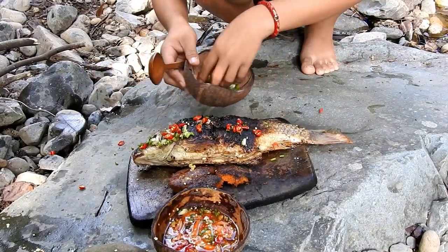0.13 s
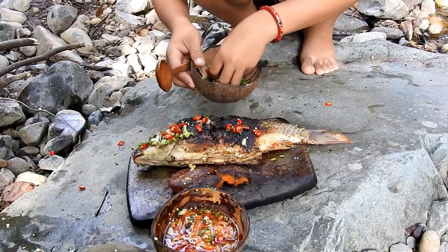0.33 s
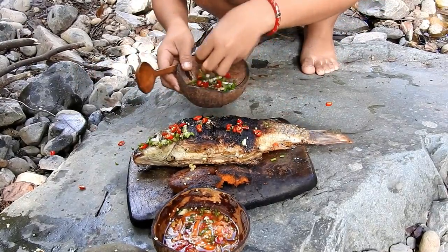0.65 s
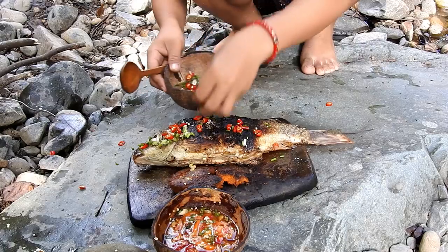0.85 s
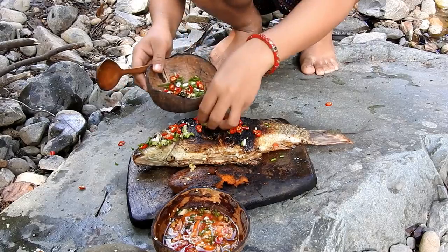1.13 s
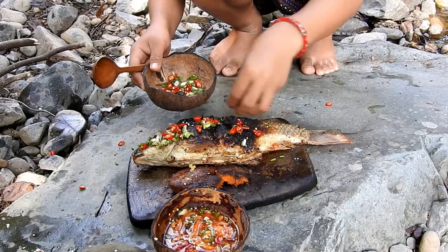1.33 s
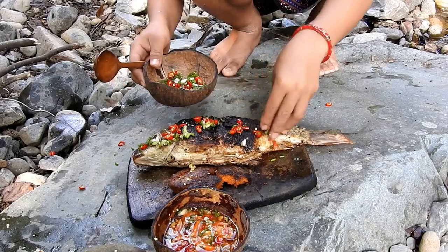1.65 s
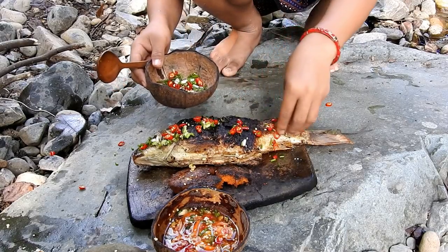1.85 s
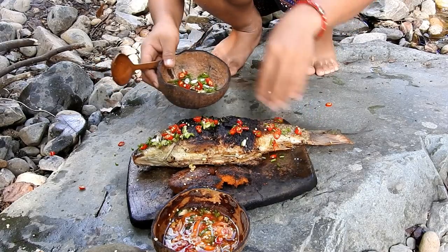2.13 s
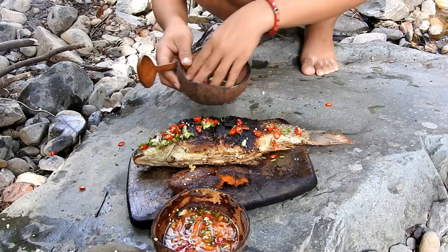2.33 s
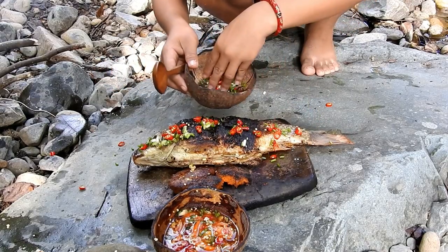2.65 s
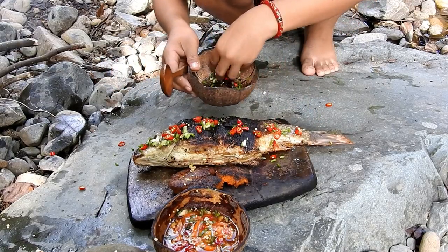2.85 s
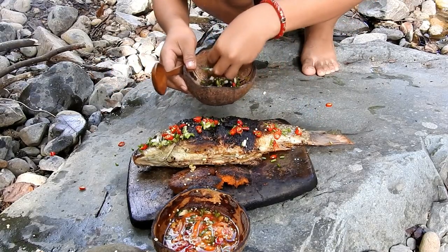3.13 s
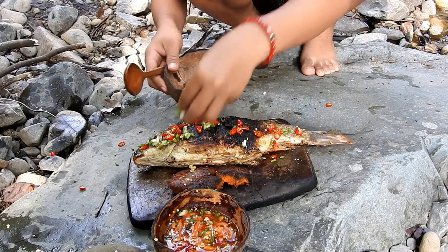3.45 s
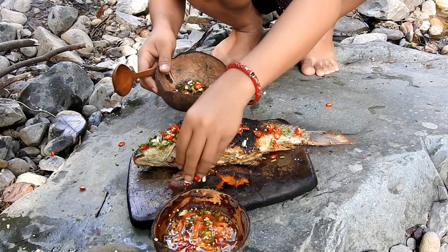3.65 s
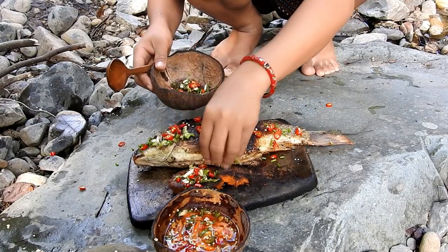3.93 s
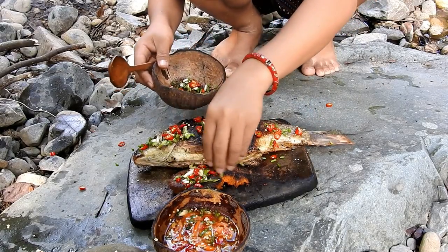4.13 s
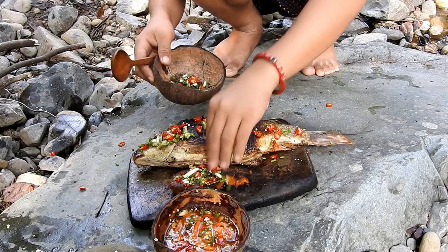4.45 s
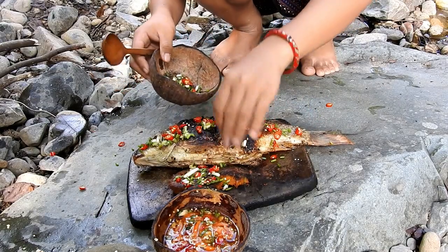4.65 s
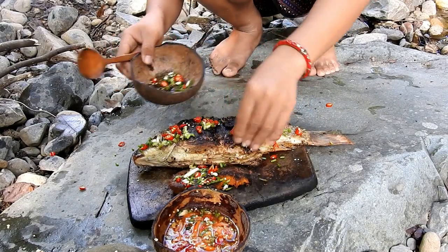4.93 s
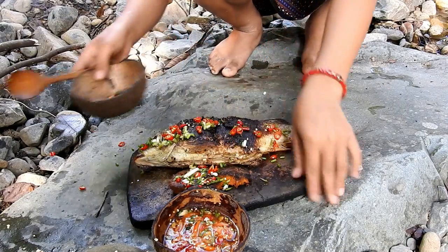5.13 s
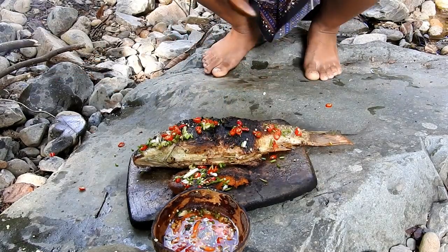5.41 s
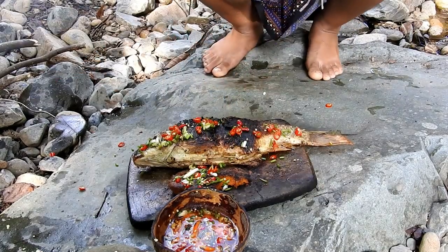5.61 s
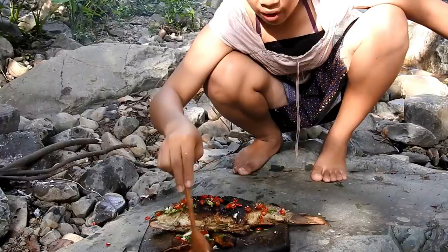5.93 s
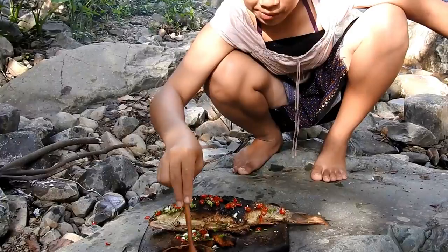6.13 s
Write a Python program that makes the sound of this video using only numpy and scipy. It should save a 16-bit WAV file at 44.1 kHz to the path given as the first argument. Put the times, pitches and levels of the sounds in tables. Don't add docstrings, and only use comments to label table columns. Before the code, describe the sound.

A shallow stream flows over stones throughout, a steady wide wash with low gurgle, mid-range bubbling and fine fizz, captured by a small stereo microphone pair with little extreme treble. Around 0.3 s a short, high raspy insect chirp sounds, with a fainter lower one together with it. Fingers tick on a wooden bowl, dry and bright, at 0.6 s and more strongly at 0.85 s. Larger bubbles plop irregularly, with a prominent cluster near 1.8 s. A softer tick comes at 2.1 s, a firm one at 3.5 s. Another thin chirp follows at 3.8 s, then a quick double tick at 4.4 s, its second touch stronger. More plops bunch around 4.95 s. Near 5.3 s there is a faint crackly tick and a last chirp. From about 5.4 to 5.9 s everything is silent; then the stream returns abruptly and continues to the end.

```python
import sys
import numpy as np
from scipy import signal
from scipy.fft import rfft, irfft
from scipy.io import wavfile
from scipy.ndimage import uniform_filter1d

SR = 44100
rng = np.random.default_rng(int(sys.argv[2]) if len(sys.argv) > 2 else 0)


def master_out(mix):
    frames = np.transpose(np.atleast_2d(mix))
    ceiling = np.clip(frames, -1, 1)
    pcm = np.round(ceiling * 32767).astype(np.int16)
    wavfile.write(sys.argv[1], SR, pcm)


def decibels_to_gain(level_db):
    exponent = np.asarray(level_db, float) / 20
    return 10 ** exponent


N = 276948


def evened(x):
    return x / np.sqrt(np.mean(x ** 2) + 1e-20)


def read(points, hz, axis=1):
    table = np.transpose(points)
    return np.interp(np.log(hz + 1), np.log(table[0] + 1), table[axis])


def add(mix, start_s, sound):
    part = mix[round(start_s * SR):][:len(sound)]
    part += sound[:len(part)]


def ports(near, other):
    # pitch_hz, likeness (0-1), left_lag_rad, left_minus_right_db
    left_right = [(40, 0.96, -.3, 0), (150, 1, 0, -3), (550, 0.98, 0.16, -3), (1207, 0.93, 0.53, -8.5),
                  (2820, .85, 0.65, -5.5), (4200, 0.8, 0.84, -2.5), (6260, 0.6, 1.74, -2),
                  (7930, 0.3, 2.5, -2.5), (9800, .62, 3.5, -1), (15000, .65, 4.5, -2)]
    hz = np.fft.rfftfreq(N, 1 / SR)
    same = np.clip(read(left_right, hz), 0, 1)
    lag = read(left_right, hz, axis=2)
    tilt = decibels_to_gain(read(left_right, hz, axis=3) / 2)
    blend = same * rfft(near) + np.sqrt(1 - same ** 2) * rfft(other)
    left = tilt * np.exp(-1j * lag) * blend
    right = rfft(near) / tilt
    mean = np.sqrt(tilt ** 2 + tilt ** -2 + 2 * same * np.cos(lag)) / 2
    return irfft(np.array([left, right]) / mean, N)


def chirp(length_s, level_db, top_hz, strokes_per_s=95, depth=0.55):
    rise_s, fade_db = 0.0045, -7.5
    flat_share, climb_s = 0.035, 0.014
    t = np.arange(0, length_s, 1 / SR)
    wander = evened(uniform_filter1d(rng.standard_normal(SR // 4), size=400))[:len(t)]
    stroke_turns = np.cumsum(strokes_per_s * (1 + 0.3 * wander)) / SR
    throb = 1 + depth * np.cos(2 * np.pi * stroke_turns)
    hz = top_hz * (1 - flat_share * np.exp(-t / climb_s) + 0.006 * wander)
    tone = np.sin(2 * np.pi * np.cumsum(hz) / SR)
    edges = np.clip(np.minimum(t, length_s - t) / rise_s, 0, 1)
    shape = edges * decibels_to_gain(fade_db * t / length_s)
    return decibels_to_gain(level_db) * shape * evened(throb * tone)


def insects(mix):
    # start_s, length_s, level_db, pitch_hz
    chirps = [
        (0.305, .125, -27, 6440),
        (0.305, 0.07, -31, 3410),
        (3.758, 0.13, -27.5, 6520),
        (5.283, 0.1, -28.5, 6520),
    ]
    for start_s, *sound in chirps:
        add(mix, start_s, chirp(*sound))


def tick(peak_db, hz, crack_db):
    t60_s, upper_ratio = 0.0045, 1.22
    t = np.arange(0, 0.05, 1 / SR)
    ring = np.sin(2 * np.pi * hz * t) + 0.6 * np.sin(2 * np.pi * upper_ratio * hz * t)
    contact = np.exp(-((t - 0.0003) / 0.00002) ** 2)
    crack = decibels_to_gain(crack_db + 17.5) * np.diff(contact, prepend=0)
    rise = (1 - np.exp(-t / 0.00017)) ** 2
    return decibels_to_gain(peak_db) * (ring * decibels_to_gain(-60 * t / t60_s) * rise + crack)


def fingers(mix):
    # start_s, peak_db, pitch_hz, crack_db (against the ring)
    ticks = [
        (0.605, -7.5, 6240, -43.5),
        (0.8452, -3, 5800, -44),
        (2.0951, -9, 5840, -44),
        (3.478, -5, 6070, -39.5),
        (4.4093, -9, 7000, -48),
        (4.4187, -2.5, 6620, -39.5),
        (5.2722, -20, 6400, -22),
    ]
    for start_s, *sound in ticks:
        add(mix, start_s, tick(*sound))


def plop(peak_db, hz, length_s):
    rise_per_s = 5.5
    u = np.arange(0, 1.6, 1 / SR / max(length_s, 0.003))
    pitch = hz * (1 + rise_per_s * length_s * (u - 0.5))
    swell = np.sin(np.pi * (u / u[-1]) ** 0.51) ** 2
    return decibels_to_gain(peak_db) * np.sin(2 * np.pi * np.cumsum(pitch) / SR) * swell


def plops(mix):
    # start_s, peak_db, pitch_hz, length_s
    pockets = [(0.131, -21, 2240, .016), (0.191, -23, 1010, 0.025), (.705, -22.5, 471, 0.036),
               (.788, -24, 3790, .012), (1.046, -21.5, 985, 0.012), (1.553, -18.5, 252, 0.024),
               (1.788, -13.5, 1276, 0.0065), (1.7886, -17, 1750, .004), (1.797, -19.5, 355, .011),
               (1.802, -20, 1770, 0.0078), (2.053, -17.5, 343, 0.023), (2.07, -21.5, 606, 0.019),
               (2.202, -20.5, 2040, 0.012), (2.425, -22.5, 585, 0.015), (2.595, -21.5, 253, 0.025),
               (2.876, -17.5, 1100, 0.0091), (2.977, -21, 2490, 0.0087), (3.462, -21.5, 3560, 0.008),
               (3.559, -22, 221, 0.021), (3.662, -19, 946, .016), (3.693, -21, 543, 0.029),
               (4.773, -20, 573, 0.021), (4.943, -18.5, 278, 0.026), (4.942, -17.5, 544, .014),
               (4.953, -17, 1130, 0.0078), (4.96, -18, 1764, 0.0087), (5.077, -20, 1820, .011),
               (5.172, -23.5, 2590, .01)]
    for start_s, *sound in pockets:
        add(mix, start_s, plop(*sound))


def wash(patchy_db=1.0, gust_db=0.5):
    frames = N // 128 + 5
    real, imaginary, patches = rng.standard_normal((3, 2, 257, frames))
    patches = uniform_filter1d(patches[0], size=6, axis=0)
    patches = evened(uniform_filter1d(patches, size=24, axis=1))
    gusts = evened(uniform_filter1d(rng.standard_normal(frames), size=16))
    spectrum = (real + 1j * imaginary) * decibels_to_gain(patchy_db * patches + gust_db * gusts)
    return evened(signal.istft(spectrum, nperseg=512, noverlap=384)[1][:, :N])


def bubbles(lo_hz, hi_hz, cycles, per_s, spread_db, level_db, count=14):
    out = np.zeros((2, N))
    for hz in np.geomspace(lo_hz, hi_hz, count):
        turns = np.arange(0, 3 * cycles, hz / SR)
        envelope = np.exp(-turns / cycles * 2) * (1 - np.exp(-turns / 0.7))
        ring = np.sin(2 * np.pi * turns * (1 + 0.013 * turns)) * envelope
        chance, size = rng.random((2, 2, N))
        loudness = decibels_to_gain(-spread_db * np.maximum(np.log(size + 1e-9), -3.5))
        train = (chance < per_s / count / SR) * loudness
        ring = ring[None] * hz / np.linalg.norm(ring) / np.sqrt(hz)
        out += signal.oaconvolve(train, ring, axes=1)[:, :N]
    share = (hi_hz - lo_hz) / (SR / 2)
    return decibels_to_gain(level_db) * np.sqrt(share) * evened(out)


def stream():
    # lowest_hz, highest_hz, ring_cycles, bubbles_per_s, size_spread_db,
    # level_db (against the wash)
    families = [
        (118.6, 897, 5, 250, 3.5, -5.5),
        (884, 4004, 6, 1200, 3.5, -3.5),
        (3896, 15000, 8.3, 2500, 5.5, -5),
    ]
    # pitch_hz, level_db (per Hz)
    colour = [(18, -50), (30, -36.5), (111, -2), (256, -0.5), (332, 1), (389, -1.5), (561, -0.5),
              (787, -2.5), (945, -4.5), (2420, -7.5), (4090, -13), (6370, -8.5), (9940, -35.5),
              (14300, -53), (15500, -55)]
    # centre_hz, width_hz, gain_db
    hollows = [(265, 60, 0.5), (382, 74, -2), (800, 60, -3), (6930, 560, 2)]
    water = wash() + sum(bubbles(*family) for family in families)
    hz = np.fft.rfftfreq(N, 1 / SR)
    colour_db = read(colour, hz)
    for centre_hz, width_hz, gain_db in hollows:
        colour_db = colour_db + gain_db / (1 + (2 * (hz - centre_hz) / width_hz) ** 2)
    coloured = irfft(rfft(water) * decibels_to_gain(colour_db), N)
    return decibels_to_gain(-19.5) * evened(ports(*coloured))


def scene():
    close = np.zeros(N)
    insects(close)
    fingers(close)
    plops(close)
    return stream() + ports(close, close)


def top_cut(x):
    return signal.sosfilt(signal.butter(12, 15720, fs=SR, output="sos"), x)


def record(dry):
    # pitch_hz, late_path_share
    overlap = [(3150, 0.016), (3450, 0.59), (3700, 0.04), (3920, 0.78), (4020, 0.37), (4130, 0.017),
               (4300, 0.05)]
    # start_s, end_s
    mute_start_s, mute_end_s = (5.373, 5.8715)
    late_s, notch_hz = 0.01015, 3921
    hz = np.fft.rfftfreq(N, 1 / SR)
    late = np.clip(read(overlap, hz), 0, 0.95)
    comb = 1 - late * np.exp(-2j * np.pi * (hz - notch_hz) * late_s)
    comb = comb / np.sqrt(1 + late ** 2)
    t = np.arange(N) / SR
    outside_s = np.maximum(mute_start_s - t, t - mute_end_s)
    gate = np.clip(outside_s / 0.0017 + 0.5, 0, 1)
    return top_cut(irfft(rfft(dry) * comb, N) * gate)


dry = scene()
out = record(dry)
master_out(out)
```